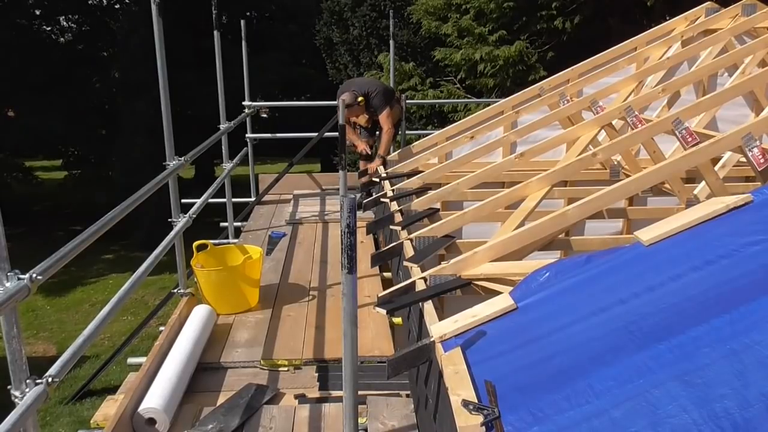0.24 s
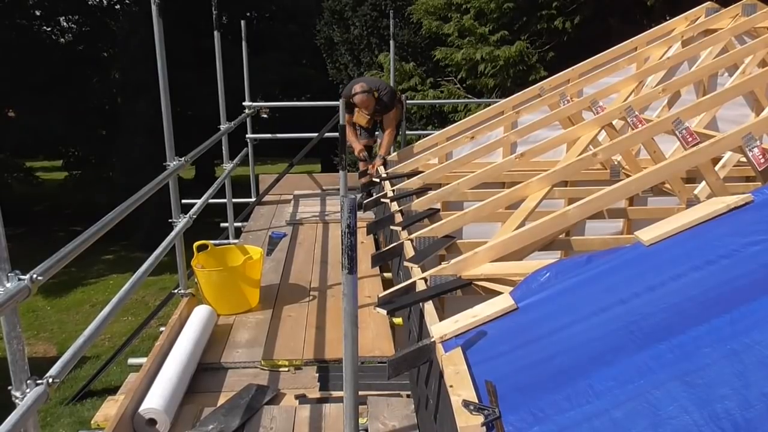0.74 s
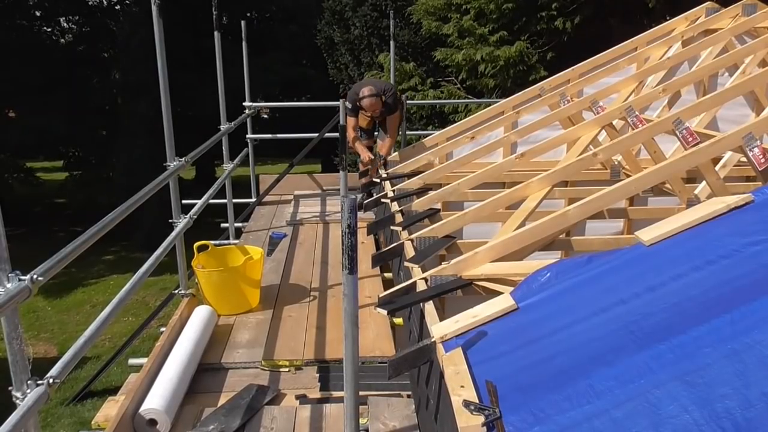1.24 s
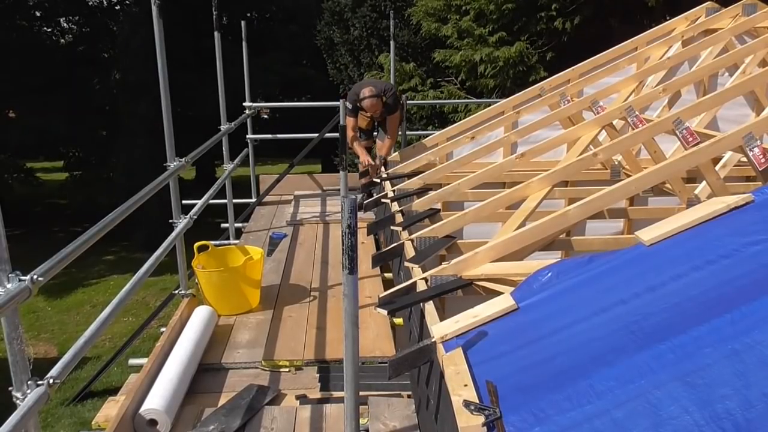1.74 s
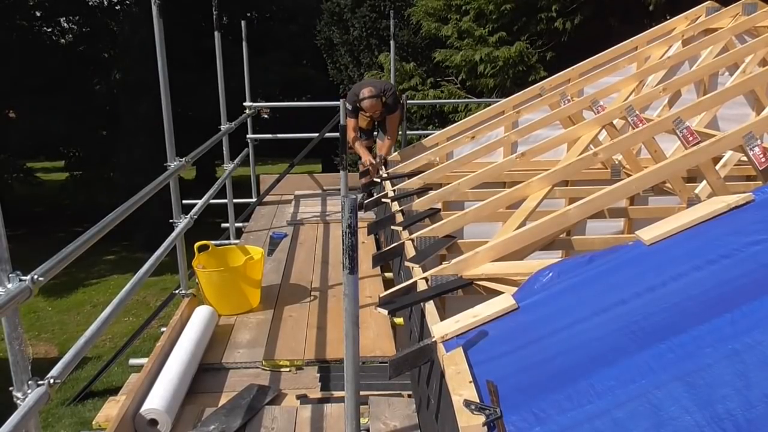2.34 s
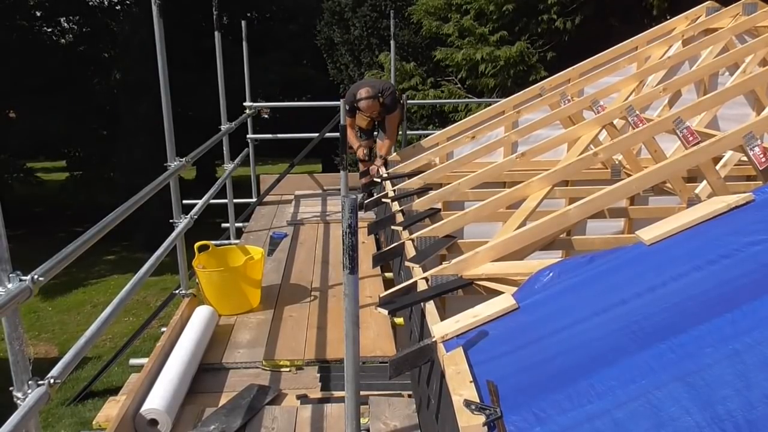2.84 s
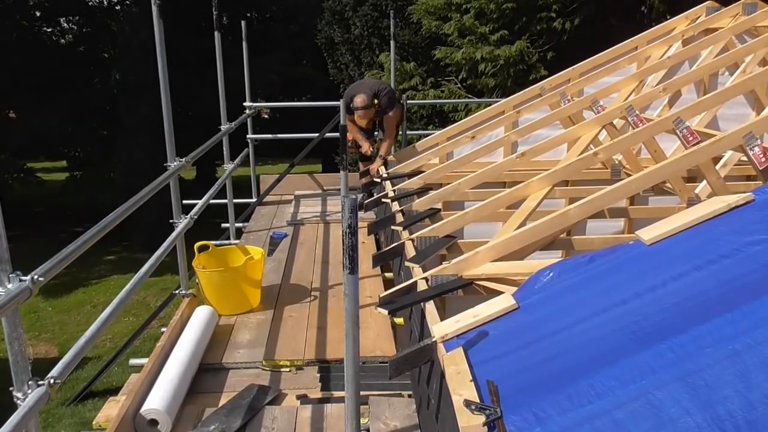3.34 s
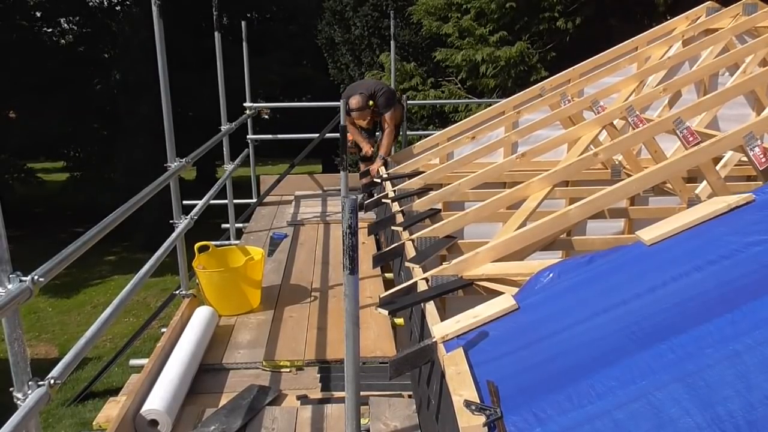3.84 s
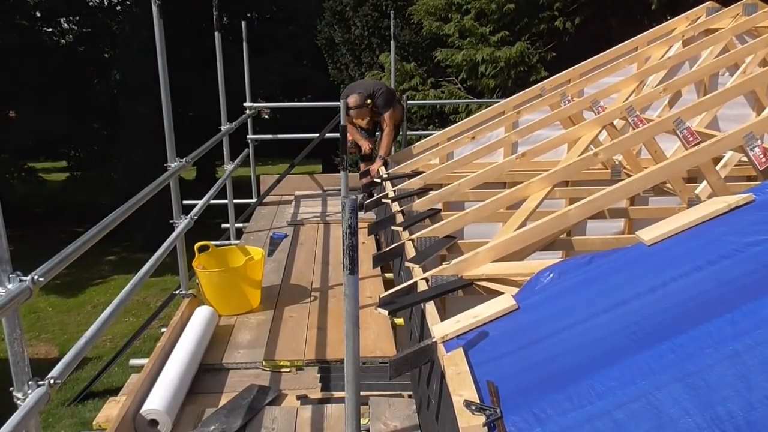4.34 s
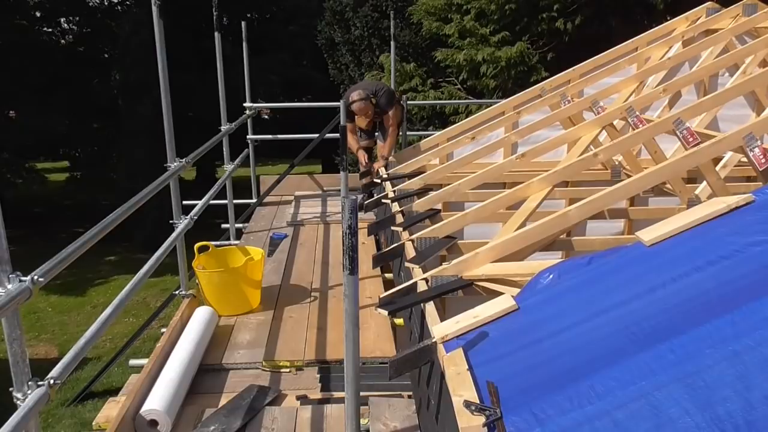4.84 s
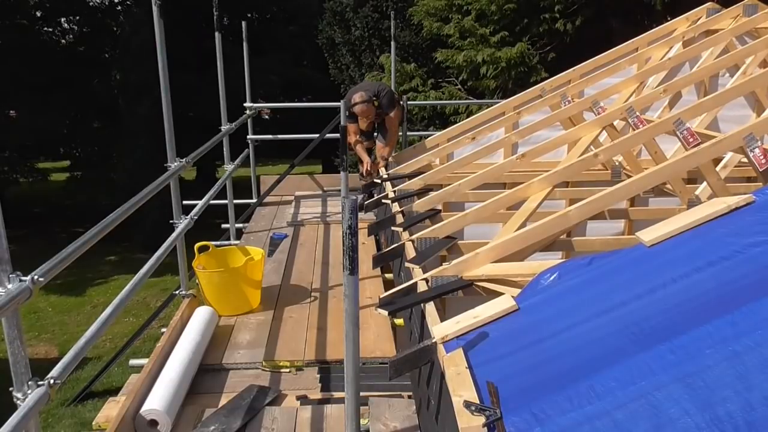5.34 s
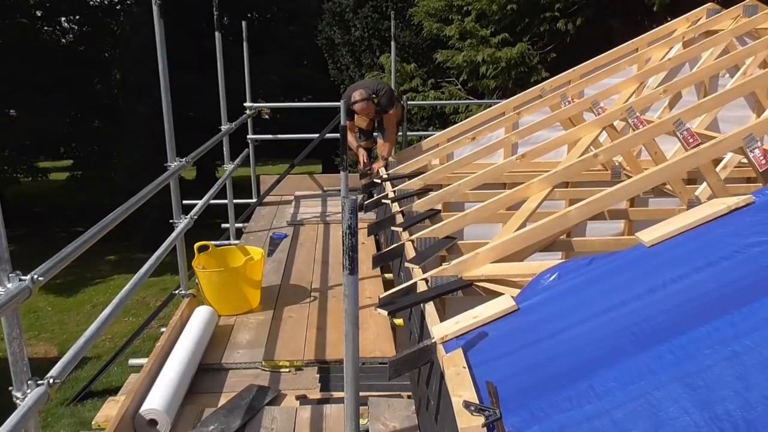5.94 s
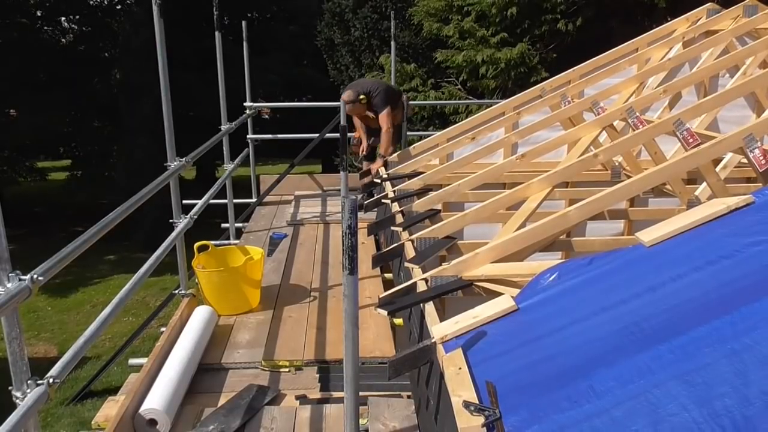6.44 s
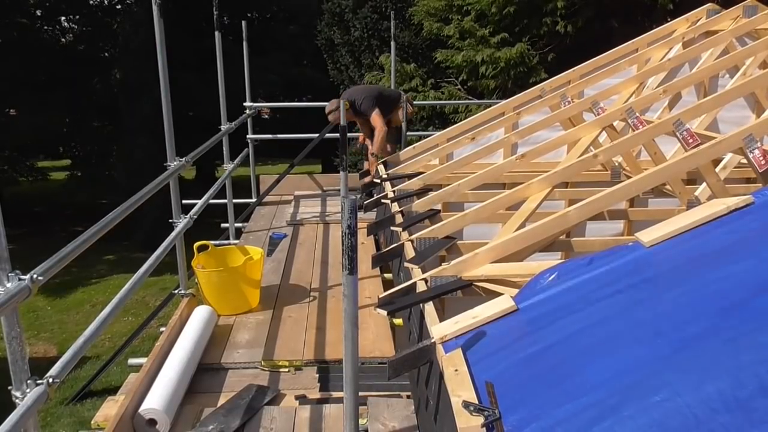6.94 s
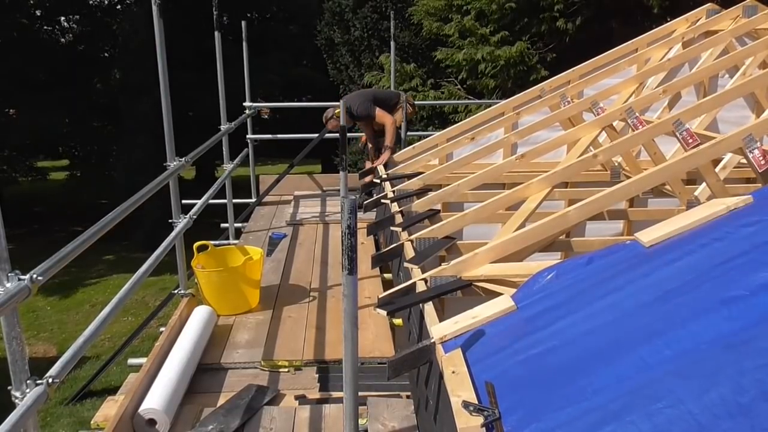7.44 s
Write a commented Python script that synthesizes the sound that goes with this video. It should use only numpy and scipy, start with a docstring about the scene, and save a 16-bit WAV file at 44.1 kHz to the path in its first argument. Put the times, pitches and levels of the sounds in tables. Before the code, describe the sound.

Stereo microphone a few metres from a hammer on a timber roof frame, open air. Sharp metallic cracks land on nails while boards ring and rattle low and hollow for a fraction of a second. Blows come in short runs separated by gaps of about a second, strongest in the last three. Then a tool thumps down on the deck, steel squeaks briefly, and small ticks and rubs follow over a quiet hush of far traffic and leaves.

```python
"""Hammer blows ring out of roof timbers, over far traffic, leaves and wind, with ticks and scrapes between.
Place: outdoors on a scaffold deck, two microphone ports a few metres from the nails. Each blow arrives first
through the structure, as ringing frame modes, then through the air as a pressure swing, bright noise and echoes.
Shaped noise makes the background, the rubs and bumps of tools and clothes, and one steel squeak."""
import sys
import numpy as np
from scipy import signal
from scipy.fft import rfft, irfft, next_fast_len
from scipy.io import wavfile
from scipy.ndimage import uniform_filter1d

SR = 44100
rng = np.random.default_rng(int(sys.argv[2]) if len(sys.argv) > 2 else 0)


def waveform_to_disk(signal):
    """Save audio, clipped to [-1, 1], as 16-bit WAV at the path in sys.argv[1]."""
    frames = np.transpose(np.atleast_2d(signal))
    scaled = np.clip(frames, -1, 1) * 32767
    samples = np.round(scaled).astype(np.int16)
    wavfile.write(sys.argv[1], SR, samples)


N = 339129  # length [samples]

# Far traffic and leaves, relative spectrum: (frequency [Hz], density [dB per Hz])
FAR_SPECTRUM = [(20, -25), (50, -5), (90, -5), (160, -6.5), (270, -4), (500, -7.5), (800, -8),
                (1300, -13.5), (1800, -23), (2600, -25), (3600, -23.5), (6000, -28.5), (12000, -33.5),
                (15800, -43)]
# Left-right likeness of the far sound: (frequency [Hz], correlation [-1 to 1])
FAR_LIKENESS = [(60, 0.16), (130, 0.37), (290, 0.73), (640, 0.52), (1410, 0.25), (3100, 0.48),
                (6820, -0.022), (15000, -0.32)]
# Wind buffeting at the ports: (time [s], level [dB])
WIND_LEVEL = [(0, -61), (.85, -56), (1.05, -82), (1.5, -75), (2.8, -66), (3.3, -60.5), (4.3, -70),
              (4.6, -82), (4.8, -53.5), (5.1, -55.5), (6, -45), (6.3, -68), (6.8, -66), (7.2, -76),
              (7.69, -80)]
# Rubs of tools and clothes: (time [s], level [dB], centre [Hz], fall to 1/e [s])
RUSTLES = [(3.779, -63.5, 3700, 0.04), (3.826, -63, 3100, .033), (4.033, -59.5, 3170, 0.067),
           (6.133, -66, 6900, .034), (6.263, -62, 3360, .05), (6.27, -70, 7600, .05),
           (6.925, -72, 3700, .02), (7.218, -65, 6500, .012), (7.31, -72, 3600, .014),
           (7.5, -70, 7340, .03), (7.525, -64, 2080, 0.022)]
# Dull bumps on the deck: (time [s], level [dB], centre [Hz], fall to 1/e [s])
BUMPS = [(.84, -49.5, 147, .047), (2.8, -50, 109, 0.055), (4.81, -47.5, 112, .13),
         (5.948, -40.5, 400, 0.0057), (5.965, -32, 198, 0.0075), (5.99, -36, 156, 0.029),
         (6.12, -46, 117, 0.04), (6.264, -45, 447, 0.014)]
# Clear ticks of tools: (time [s], level [dB], centre [Hz])
TICKS = [(6.695, -59, 3600), (6.925, -66, 7000), (6.938, -66, 7000), (7.014, -60, 5000), (7.066, -68, 4000),
         (7.115, -67, 4000), (7.137, -63, 6500), (7.151, -51.5, 2600), (7.423, -69, 2600)]
# Steel dragged on steel: (frequency [Hz], level [dB], delay [s], length [s])
SQUEAK_MODES = [(1680, -62, 0.0051, .11), (2470, -64.5, 0, .105), (3500, -74, .03, .08),
                (3950, -73, 0, .04), (5600, -78, 0, .035), (6800, -74, 0, .035)]
# Crowded modes of the frame, relative strength: (frequency [Hz], strength [dB])
FRAME_STRENGTH = [(32, -44), (55, -5.5), (187, -1.5), (389, -2), (537, -3), (658, -8), (1120, -9.5),
                  (1710, -22), (1990, -22.5), (3200, -30.5), (4160, -68), (7040, -120)]
# Boards that stand out of the frame: (frequency [Hz], width [Hz], lift [dB])
BOARD_MODES = [(94.7, 12, 17.5), (149, 6, -2.5), (205.3, 41, 7.5), (290, 66, 1.5), (447, 44, 3.5),
               (520, 26, 2.5), (766, 50, -1), (870, 30, -2), (1142, 9.3, 6.5), (2310, 110, 4)]
# Decay of the frame before the rebounds hold it up: (frequency [Hz], time to fall 60 dB [s])
RING_T60 = [(60, 2.3), (100, 0.93), (240, 0.5), (480, 0.37), (1000, 0.33), (1700, 0.38), (3000, 0.17)]
# Frame bands that follow the knock:
# (from [Hz], to [Hz], build-up [s], exponent on the rebound hold, level over the knock [dB])
KNOCK_BANDS = [(0, 120, 0.032, 0.35, -18.5), (120.5, 250, 0.024, 0.75, -5), (247.7, 700, 0.0085, 0.76, 0.1)]
# Frame bands that follow the clack:
# (from [Hz], to [Hz], build-up [s], exponent on the rebound hold, level over the clack [dB])
CLACK_BANDS = [(710, 1500, 0.0025, 0.61, -1.43), (1490, 3200, 0.0032, 0.5, -14.5)]
# Bright noise of the crack, relative spectrum: (frequency [Hz], density [dB per Hz])
CRACK_SPECTRUM = [(180, -34.5), (300, -0.5), (602, 20), (1330, -18), (2820, -27), (4950, -28), (6450, -36),
                  (7010, -21.5), (10100, -37), (11900, -35), (15800, -50)]
# Modes of hammer head and nail: (frequency [Hz], width [Hz], lift [dB])
STEEL_MODES = [(2230, 160, 2.5), (3610, 930, 8.5), (4990, 79, 13), (6000, 500, 8), (7200, 1700, -2),
               (9300, 820, 5)]
# Scattered echoes, relative spectrum: (frequency [Hz], density [dB per Hz])
SCATTER_SPECTRUM = [(1060, -19), (1800, -11), (1990, 5.5), (2730, -4.5), (3690, -2), (5870, -12.5),
                    (9330, -18), (13800, -46), (15800, -66)]
# Hammer blows: (time [s], knock of the wood [dB], clack of its upper modes [dB], crack of the steel [dB],
# crack tilt [dB per octave], loudest board [Hz], its level [dB], nail shank [Hz], its lift in the crack [dB])
BLOWS = [(0.0074, -21, -23, -27, -1.5, 567, -31.5, 2000, -9),
         (0.281, -21, -25, -27, -0.4, 550, -35, 2460, 4),
         (0.516, -20.5, -26, -33.5, 2.5, 233, -29, 3250, 12.5),
         (1.309, -26, -26.5, -32, -4, 239, -23.5, 2200, 13.5),
         (1.5846, -23, -22.5, -24, -1.5, 420, -46, 2220, 9.5),
         (1.8802, -23, -28.5, -29, -0.2, 229, -29, 2230, -4),
         (2.1827, -24.5, -22, -23, -1, 397, -38, 2280, 12),
         (2.4881, -25.5, -22, -25.5, 1.1, 462, -28, 2430, 13),
         (3.6045, -33, -33.5, -36.5, -10, 297, -30.5, 3570, 3.5),
         (3.906, -23.5, -28, -34.5, 0.5, 236, -26.5, 2100, 15),
         (4.2038, -22, -25.5, -28, -3, 500, -31.5, 3590, 1),
         (5.2522, -18.5, -21.5, -24.5, -1.5, 464, -36, 2000, 12.5),
         (5.5232, -18.5, -18.5, -24, -2.5, 547, -50, 2010, 7.5),
         (5.7386, -19.5, -22.5, -24.5, -8, 345, -33, 2020, 1.5)]

FAR_DB = -55
RUSTLE_WIDTH, BUMP_WIDTH, TICK_WIDTH = 0.69, 1.25, 2.2  # width of the resonance over its centre
TICK_S, SQUEAK_S = .0025, 6.146  # fall of a tick to 1/e; start of the squeak
FAINT_TICKS_S, FAINT_TICK_DB, FAINT_TICK_HZ = (6.65, 7.6), (-69, -63), (2500, 7000)  # ranges of chance
STRUCTURE_LEAD_S = .007  # the structure speaks this long before the air
FORERUNNER, FULL_RING_S = 0.51, 0.0093  # share of the ring that runs ahead; when the rest starts to build
REBOUND_S = .054  # slack boards hold the level up this long
FIRM_DB, FADE_DB_PER_S, FADE_PER_SOFTER_DB = -25.5, 7, 12.5  # cracks below FIRM_DB: the ring dies faster
SLAP_DB, WOOD_SIDE_DB = 1.2, -3  # rebounds over the knock; left minus right of the timber
SWING_DB = 10.5  # over the crack
ECHO_DB, ECHO_PER_TILT_DB = -20, 0.88  # over the crack; a duller crack scatters less
EDGE_HZ = 15850  # upper band limit


def amp(db):
    """Decibels to gain."""
    return 10 ** (np.asarray(db) / 20)


def evened(x):
    """Scales to rms 1."""
    return x / np.sqrt(np.mean(x ** 2) + 1e-20)


def read(points, hz):
    """Looks a value up on a log-frequency axis."""
    f, value = np.transpose(points)
    return np.interp(np.log(hz + 1), np.log(f + 1), value)


def add(mix, s, sound):
    """Mixes a sound in at time s."""
    part = mix[:, max(round(s * SR), 0):][:, :sound.shape[-1]]
    part += sound[..., :part.shape[1]]


def hump(hz, centre_hz, width):
    """Gain of one resonance."""
    return 1 / np.sqrt(1 + (2 * (hz - centre_hz) / width) ** 2)


def lifts(modes, hz):
    """Sum of resonant lifts in dB, from rows of frequency, width and lift."""
    return sum(db * hump(hz, f, width) ** 2 for f, width, db in modes)


def noise(gain, size, same):
    """Two-channel noise with spectrum gain(hz) and left-right likeness same."""
    a, b = rfft(rng.standard_normal((2, size)))
    same = np.clip(same, -1, 1)
    spectra = np.array([a, same * a + np.sqrt(1 - same ** 2) * b])
    return evened(irfft(spectra * gain(np.fft.rfftfreq(size, 1 / SR)), size))


def far_background():
    """Far traffic and leaves: shaped noise whose level drifts in patches of time and frequency."""
    frames, hz = N // 256 + 5, np.fft.rfftfreq(1024, 1 / SR)
    a, b, c, d, patches = rng.standard_normal((frames, 513, 5)).T
    patches = evened(uniform_filter1d(uniform_filter1d(patches, 14, 0), 16, 1))
    swell = evened(uniform_filter1d(uniform_filter1d(rng.standard_normal(frames), 40), 40))
    same = np.clip(read(FAR_LIKENESS, hz), -1, 1)[:, None]
    left = a + 1j * b
    right = same * left + np.sqrt(1 - same ** 2) * (c + 1j * d)
    level_db = read(FAR_SPECTRUM, hz)[:, None] + .8 * patches + .35 * swell
    spectra = np.array([left, right]) * amp(level_db)
    far = signal.istft(spectra, nperseg=1024, noverlap=768)[1][:, :N]
    return amp(FAR_DB) * evened(far)


def wind():
    """Wind buffets the ports: deep lumpy noise, partly opposed between left and right."""
    def colour(hz):
        return hump(hz, 60, 61) ** 2 * hz / (hz + 40)
    buffeting = noise(colour, size=next_fast_len(N), same=-0.52)[:, :N]
    lumps = amp(3 * evened(uniform_filter1d(rng.standard_normal(N), 4000)))
    level_db = np.interp(np.arange(N) / SR, *np.transpose(WIND_LEVEL))
    return buffeting * lumps * amp(level_db)


def puffs(rows, width, same):
    """Short bursts of noise in one broad resonance, quick rise and slower fall."""
    out, t = np.zeros((2, N)), np.arange(6144) / SR
    for s, db, centre_hz, length in rows:
        shape = np.clip(t / (.15 * length), 0, 1) * np.exp(-(t / length) ** 2)

        def colour(hz):
            return hump(hz, centre_hz, width * centre_hz) ** 2 * hz / (hz + centre_hz)
        burst = evened(shape * noise(colour, size=len(t), same=same))
        add(out, s, amp(db) * burst * np.sqrt(np.mean(shape ** 2)))
    return out


def rustles():
    """Tools and clothes rub: brief bands of noise."""
    return puffs(RUSTLES, RUSTLE_WIDTH, same=0.6)


def bumps():
    """Dull bumps on the deck: brief low bands of noise, little alike left and right."""
    return puffs(BUMPS, BUMP_WIDTH, same=0.18)


def ticks(count=14):
    """Clear ticks of tools, and others by chance, as very short broad bursts of noise."""
    chance = [rng.uniform(*span, count) for span in (FAINT_TICKS_S, FAINT_TICK_DB, FAINT_TICK_HZ)]
    rows = [*TICKS, *zip(*chance)]
    return puffs([(*row, TICK_S) for row in rows], TICK_WIDTH, same=0.53)


def squeak():
    """Steel dragged on steel: narrow bands of noise sing for a moment at a few modes."""
    out = np.zeros((2, N))
    for f, db, delay, length in SQUEAK_MODES:
        size = 2 * round(length * SR / 2)

        def colour(hz):
            return hump(hz, f, 150) ** 2 + .12 * hump(hz, f, 700)
        tone = noise(colour, size=size, same=0.91)
        add(out, SQUEAK_S + delay, amp(db) * tone * signal.windows.tukey(size, .45))
    return out


def frame_modes(count=330):
    """The crowded modes of rafters and deck: frequencies, strengths, and their dying oscillations."""
    place = (np.arange(count) + rng.random(count)) / count
    hz = 60 * (3200 / 60) ** (place ** .6)
    t = np.arange(round(.5 * SR)) / SR
    spacing = np.sqrt(np.gradient(uniform_filter1d(hz, 5)))  # sparser modes each carry more
    strength = spacing * amp(read(FRAME_STRENGTH, hz) + lifts(BOARD_MODES, hz))
    motion = 2j * np.pi * hz - np.log(1000) / read(RING_T60, hz)
    rings = np.exp(np.outer(motion, t).astype(np.complex64))
    return hz, strength, rings, t


def mode_shake(hz):
    """Chance phase of every mode at the two ports; the deepest modes differ most between them."""
    phase, a, b = rng.standard_normal((3, len(hz)))
    deep = 1 / (1 + (hz / 95) ** 4)  # the deepest modes rock the microphone
    left = np.exp(2j * np.pi * phase)
    right = left * np.exp(2.2j * deep) + (.28 + .4 * deep) * (a + 1j * b)
    return np.array([left, right]) * amp(np.outer([.5, -.5], WOOD_SIDE_DB * (1 - deep)))


def rebounds(t):
    """Slack boards slap back: six short negative pushes, each flanked by smaller positive ones."""
    where, size = rng.random((2, 6))
    u = (t[:8192, None] - .016 - where * (REBOUND_S + 0.023)) / 0.00098
    return -(size ** 2 * np.exp(-u ** 2) * (1 - 2 * u ** 2)).sum(1)


def timber(row, hz, strength, rings, t):
    """One blow shakes the frame's modes; slack boards rebound and keep the level up for a while."""
    _, knock_db, clack_db, crack_db, _, board_hz, board_db = row[:7]
    shake = mode_shake(hz)
    near = hump(hz, board_hz, 84) ** 2  # the board under the nail
    near *= amp(board_db) / np.linalg.norm(near)
    fade = FADE_DB_PER_S + FADE_PER_SOFTER_DB * (FIRM_DB - crack_db)
    # a lift of 60 dB per second against the decay, until the rebounds end
    held = amp(60 * np.minimum(t, REBOUND_S)) / np.sqrt(1 + amp(fade * (t - REBOUND_S)) ** 2)
    ring = np.zeros((2, len(t)))
    for blow_db, bands in ((knock_db, KNOCK_BANDS), (clack_db, CLACK_BANDS)):
        for lo, hi, build, share, db in bands:
            k = (hz >= lo) & (hz < hi)
            level = amp(blow_db + db) * strength[k] / np.linalg.norm(strength[k]) + near[k]
            # a forerunner through the wood, then the full ring once the air path arrives
            early = np.clip(t / max(build, .006), 0, 1)
            late = np.clip((t - FULL_RING_S) / build, 0, 1)
            rise = FORERUNNER * early + (1 - FORERUNNER) * late
            band = ((shake[:, k] * level).astype(np.complex64) @ rings[k]).real
            ring += rise * held ** share * band
    add(ring, 0, amp(knock_db + SLAP_DB) * rebounds(t))
    return ring


def crack_snap(t, tilt_db, nail_hz, nail_db):
    """Steel on the nail head: bright noise with steel modes, a fast fall and a weaker, slower tail."""
    def colour(hz):
        steel_db = read(CRACK_SPECTRUM, hz) + lifts([*STEEL_MODES, (nail_hz, 350, nail_db)], hz)
        octaves = np.log2(np.maximum(hz, 1500) / 3000)
        return amp(steel_db + tilt_db * octaves) * (hz > 1200)
    snap = noise(colour, size=len(t), same=0.94) * np.clip(t / 0.0047, 0, 1)
    return snap * (amp(-60 * np.maximum(t - .0035, 0) / 0.011) + amp(-12 - 60 * t / 0.11))


def crack_echoes(t):
    """Rafters and trees scatter the crack: flickering noise that falls 60 dB in 0.57 s."""
    def colour(hz):
        return amp(read(SCATTER_SPECTRUM, hz)) * (hz > 1500)
    echoes = noise(colour, size=len(t), same=0.39)
    flicker = amp(0.44 * evened(uniform_filter1d(rng.standard_normal(len(t)), 150)))
    return echoes * flicker * np.clip(t / 0.0062, 0, 1) * amp(-60 * t / 0.57)


def crack(crack_db, tilt_db, nail_hz, nail_db):
    """The blow through the air: a pressure swing, the snap of steel and scattered echoes."""
    t = np.arange(16384) / SR
    snap = crack_snap(t, tilt_db, nail_hz, nail_db)
    echoes = amp(ECHO_DB + ECHO_PER_TILT_DB * tilt_db) * crack_echoes(t)
    u = (t - .0016) / 0.00073
    swing = (1 - 2 * u ** 2) * np.exp(-u ** 2) * amp(SWING_DB)  # the board's face jumps
    return amp(crack_db) * (swing + snap + echoes)


def hammer():
    """Every blow: wood carries sound faster than air, so the frame speaks before the crack."""
    out, modes = np.zeros((2, N)), frame_modes()
    for row in BLOWS:
        add(out, row[0] - STRUCTURE_LEAD_S, timber(row, *modes))
        add(out, row[0], crack(*row[3:5], *row[7:]))
    return out


def scene():
    """All sources at the two microphone ports."""
    background = far_background() + wind()
    handling = rustles() + bumps() + ticks() + squeak()
    return background + handling + hammer()


def record(dry):
    """The microphone's bass roll-off below 45 Hz, then a steep upper band limit."""
    thin = signal.lfilter(*signal.butter(1, 45, "high", fs=SR), dry)
    band_limit = signal.firwin(511, EDGE_HZ, window=("kaiser", 9), fs=SR)
    return signal.oaconvolve(thin, band_limit[None], "same")


dry = scene()
out = record(dry)
waveform_to_disk(out)
```